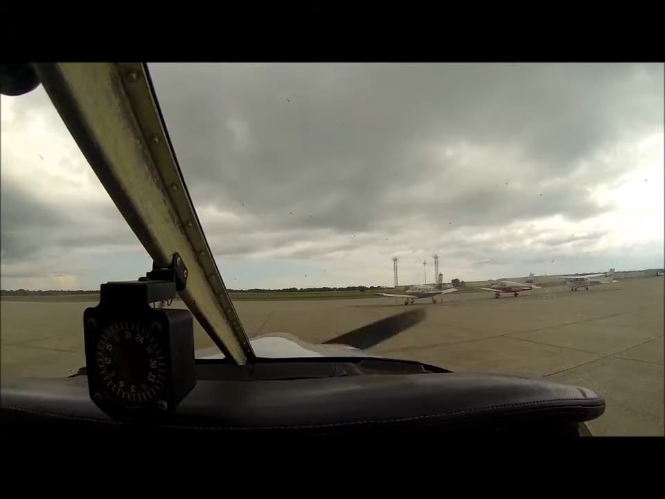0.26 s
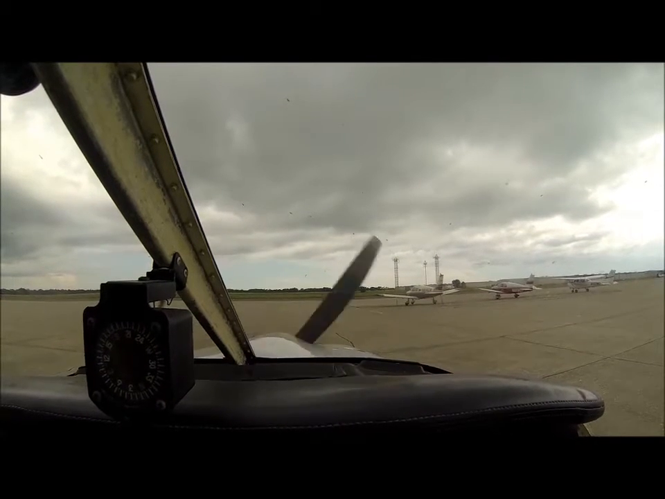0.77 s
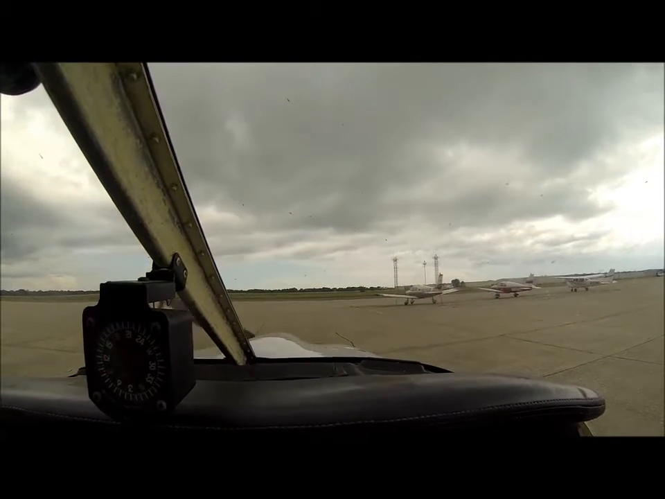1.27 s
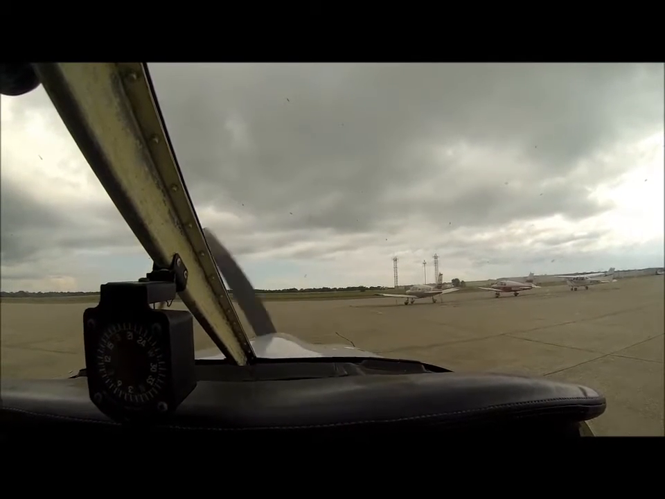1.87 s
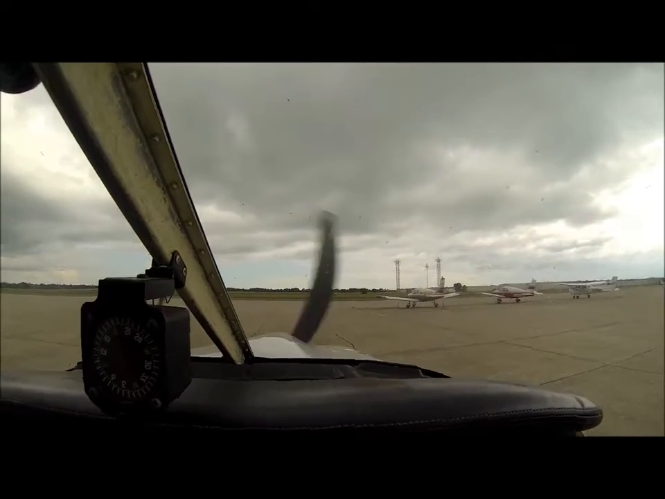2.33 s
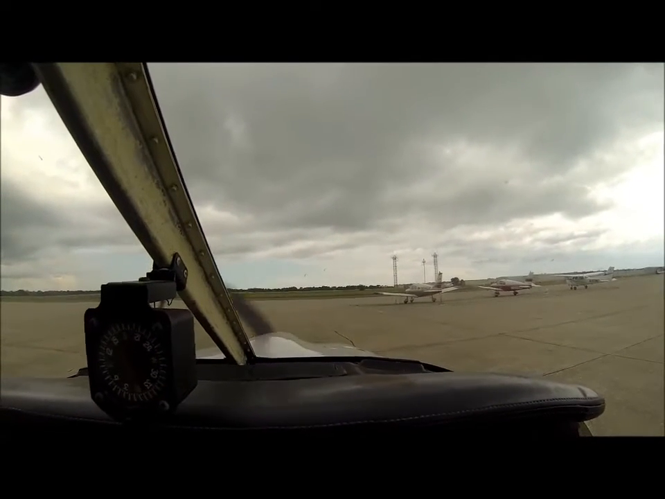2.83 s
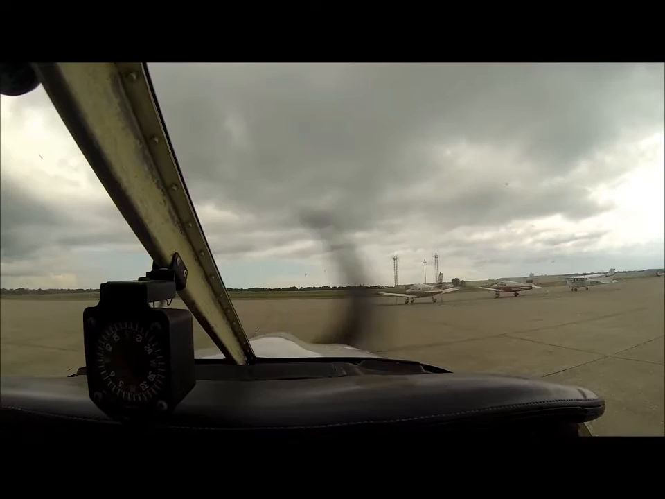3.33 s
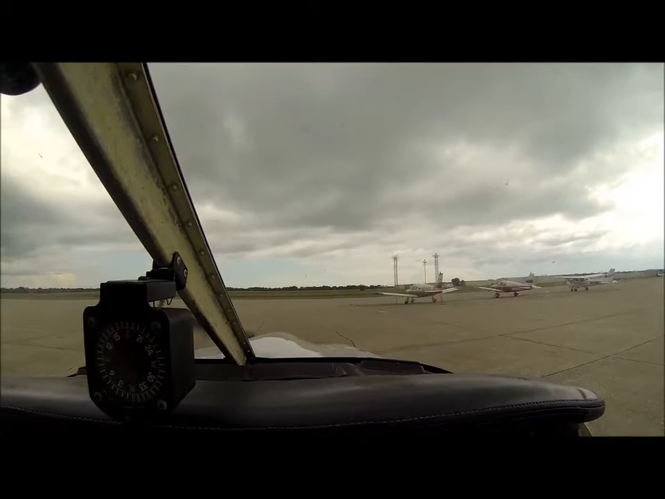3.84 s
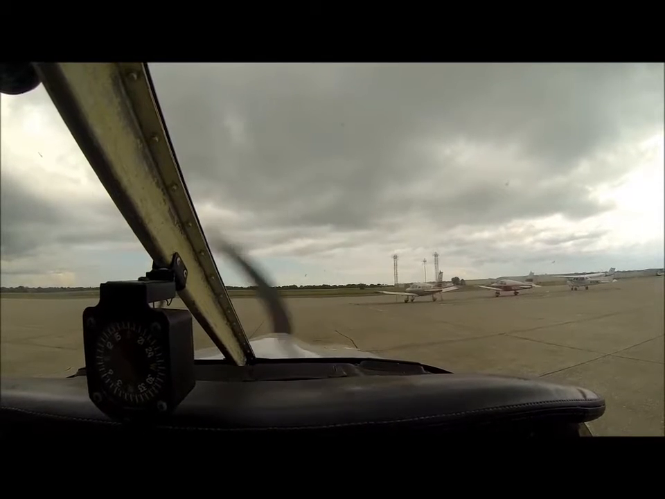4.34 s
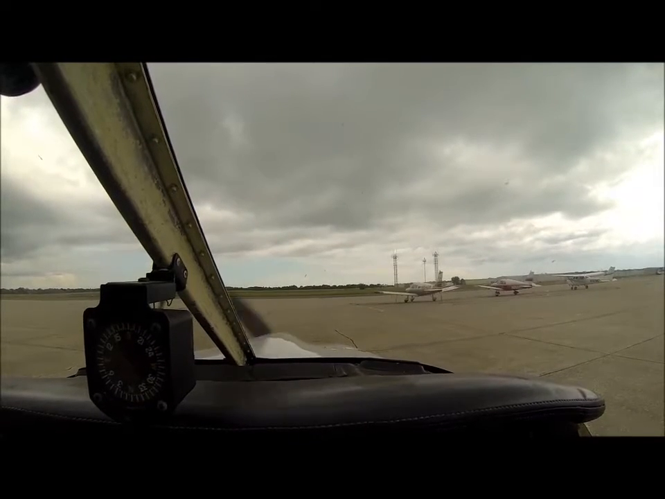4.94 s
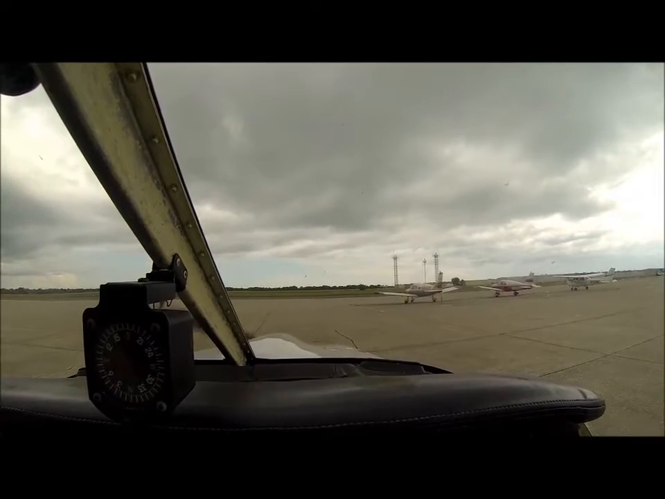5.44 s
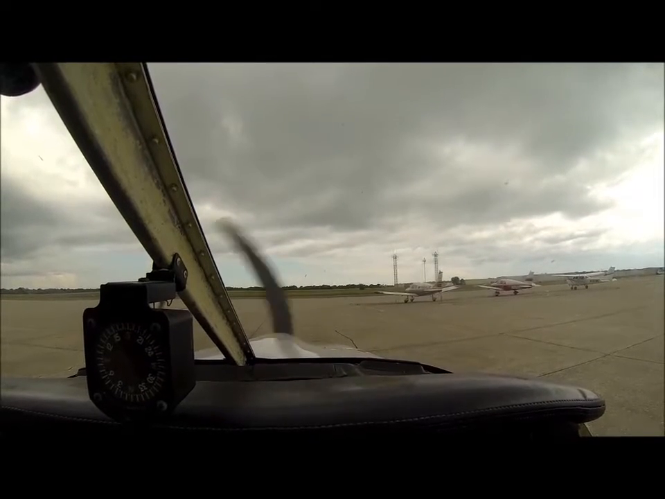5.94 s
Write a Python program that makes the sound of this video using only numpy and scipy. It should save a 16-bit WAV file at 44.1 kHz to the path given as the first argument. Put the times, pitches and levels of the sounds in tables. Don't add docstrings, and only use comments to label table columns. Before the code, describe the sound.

Inside a small plane's cabin, laboured cranking with hard plastic clicks gives way to an engine firing up, roaring briefly and settling into lumpy idling.

```python
import sys
import numpy as np
from scipy import signal
from scipy.fft import rfft, irfft, next_fast_len
from scipy.io import wavfile
from scipy.ndimage import uniform_filter1d, map_coordinates

SR = 44100
rng = np.random.default_rng(int(sys.argv[2]) if len(sys.argv) > 2 else 0)


def attenuation_scalar(level_db):
    decades = np.asarray(level_db, float) / 20
    return 10 ** decades


def file_out(sig):
    cols = np.atleast_2d(sig).T
    lim = np.clip(cols, -1, 1)
    pcm = np.round(lim * 32767).astype(np.int16)
    wavfile.write(sys.argv[1], SR, pcm)


N = 273420
TIME = np.arange(N) / SR
LOADED_TO_S, LOADED_FADE_S = 0.811, 0.086


def unit(x):
    return x / np.sqrt(np.mean(x ** 2) + 1e-20)


def curves(rows):
    s, *cols = np.transpose(rows)
    return [np.interp(TIME, s, c) for c in cols]


def during(rows, fade):
    start, end = rows[0][0], rows[-1][0]
    return np.interp(TIME, [start - fade, start, end, end + fade], [0, 1, 1, 0])


def wobble(rate):
    knots = rng.standard_normal(int(N * rate / SR) + 4)
    return map_coordinates(knots, [np.arange(N) * rate / SR])


def filtered(x, response):
    m = next_fast_len(N + SR // 2)
    return irfft(rfft(x, m) * response(np.fft.rfftfreq(m, 1 / SR)), m)[:N]


def colour(points):
    f, db = np.transpose(points)
    return lambda hz: attenuation_scalar(np.interp(np.log(hz + 1), np.log(f + 1), db))


def modes(peaks):
    def response(f):
        total = 0
        for k, (centre, width, db) in enumerate(peaks):
            total = total + (-1) ** k * attenuation_scalar(db) * 1j * f * width / (centre ** 2 - f * f + 1j * f * width)
        return total
    return response


def dulled(response, top_hz):
    return lambda f: response(f) / (1 + 1j * f / top_hz * 1.31 - (f / top_hz) ** 2) ** 2


# f/Hz, width/Hz, level/dB
CAVITIES = [(1547, 26, 0), (1891, 56, 2.5), (2535, 135, 0), (2850, 58, -1), (3070, 92, -9), (3630, 82, -5),
            (4800, 170, 0.5), (6330, 380, 1.5), (7770, 440, -8.5)]


def housed(points):
    return lambda f: colour(points)(f) * (1 + 0.86 * np.abs(modes(CAVITIES)(f)))


def noise(response):
    return unit(filtered(rng.standard_normal(N), response))


def bursts(times, dbs, lengths, attack):
    out, t = np.zeros(N + SR), np.arange(SR // 5) / SR
    for s, db, length in zip(times, dbs, np.abs(lengths) + 0.0012 + 0 * times):
        out[round(s * SR):][:len(t)] += attenuation_scalar(db - 26 * t / length) * (1 - np.exp(-t / attack))
    return out[:N]


def blows(times, dbs):
    return np.bincount(np.round(times * SR).astype(int), attenuation_scalar(dbs), N)


# t/s, firings per s, first order level/dB, second order level/dB
FIRING = [(2.4, 26.0, -25, -28), (2.5, 27.0, -28, -26), (2.77, 37.9, -29, -24.5), (3.09, 51.2, -35, -24),
          (3.21, 58.5, -38, -30), (3.27, 59, -38, -30), (3.33, 56.9, -22, -35), (3.61, 50.2, -25, -30),
          (4.02, 47.4, -22, -38), (4.19, 49.5, -24, -36), (4.3, 52, -27, -28), (4.42, 50.3, -18, -32),
          (4.67, 42.1, -24, -36), (4.83, 38.5, -25, -30), (5.1, 36.1, -24, -28), (5.77, 34.9, -27, -31),
          (5.86, 34.4, -29, -28), (6.2, 34.6, -24, -27)]


def firing_turns():
    return np.cumsum(curves(FIRING)[0]) / SR


def puffs(depth_db, scatter_db, lag):
    turns = firing_turns() + lag + 0.2 * wobble(15)
    sizes = rng.standard_normal(int(turns.max()) + 2)[np.abs(turns).astype(int)]
    stroke_db = during(FIRING, 0.19) * (scatter_db * sizes - depth_db * (turns % 1 - .5))
    return unit(attenuation_scalar(uniform_filter1d(stroke_db, size=SR // 250)))


# t/s, level/dB
STARTER_EFFORT = [(0.03, 7), (0.13, 2.5), (0.48, 4), (0.61, 4.5), (0.68, 4.5), (0.79, 3.5), (1.03, -3),
                  (1.16, 3.5), (1.29, 1), (1.49, -2.5), (1.87, 1.5), (2.11, 4.5), (2.34, -2)]
# t/s, level/dB
THROTTLE_EFFORT = [(2.38, -5.5), (2.45, -1), (2.68, -3.5), (2.809, -3), (3.131, 5), (3.46, 2), (3.48, -10),
                   (3.61, -0.5), (4.11, -0.5), (4.29, 2.5), (4.39, -1.5), (4.63, -2), (5.1, -2.5),
                   (5.67, 1.5), (5.98, 1), (6.08, 3.5), (6.2, 5)]
# t/s, loss/dB (negative: a gain)
UNEVEN_STROKES = [
    (2.522, 9.5),
    (2.6, 6),
    (3.49, -6),
    (3.537, -2.5),
    (4.599, 2.5),
]
# t/s, length/s, loss/dB
LULLS = [(.28, 0.024, 2.5), (.065, 0.037, 2.5), (0.13, 0.027, 0), (0.324, .03, 1), (0.511, 0.059, 2.5),
         (.71, 0.013, 0.5), (0.864, 0.04, 5), (0.985, 0.041, 2), (1.309, 0.0093, 14), (1.384, 0.03, 3),
         (1.568, 0.043, 2.5), (2.321, 0.033, 4)]


def effort():
    effort_db = curves(STARTER_EFFORT + THROTTLE_EFFORT)[0]
    for s, loss_db in UNEVEN_STROKES:
        effort_db = effort_db - loss_db * during([[s]], 0.052)
    for s, length, loss_db in LULLS:
        effort_db = effort_db - loss_db * during([[s], [s + abs(length)]], 0.012)
    return effort_db


# level/dB at effort 0, dB per dB of effort
CRANK_LAYERS = [(-22.5, 2.07), (-44, 1.5), (-52.5, 1.38)]
RUN_LAYERS = [(-19.5, 0.67), (-32.5, 0.91), (-49, 0.96)]


def layer_levels():
    running, effort_db = during(FIRING, 0.087), effort()
    levels = []
    for (db, slope), (run_db, run_slope) in zip(CRANK_LAYERS, RUN_LAYERS):
        cranked = (1 - running) * (db + slope * effort_db)
        levels.append(cranked + running * (run_db + run_slope * effort_db))
    return levels


# t/s, level/dB
TICKS = [
    (0.001, -30),
    (3.419, -44),
    (6.055, -43),
]
# f/Hz, level/dB per Hz
HIGH_HISS = [(8000, -17), (12000, -6), (14500, 2), (15200, 2), (15500, -40)]


def small_noises():
    s, db = np.transpose(TICKS)
    load = .4 + .6 * during([[0], [LOADED_TO_S]], LOADED_FADE_S)
    hiss = attenuation_scalar(-84 + 1.5 * wobble(20)) * load * noise(colour(HIGH_HISS))
    return hiss + bursts(s, db, .001 + 0 * s, .0001) * rng.standard_normal(N)


# t/s, length/s, f/Hz, level/dB
WHISTLES = [(0.086, 0.027, 6500, -72), (0.113, 0.013, 3570, -52), (0.143, .03, 4900, -62),
            (0.297, 0.017, 3460, -49), (0.373, 0.017, 3470, -58), (1.905, .02, 12000, -69),
            (0.748, 0.027, 3350, -46.5), (1.03, .022, 3400, -61), (1.07, 0.026, 3540, -64),
            (1.27, 0.013, 5030, -60), (1.419, 0.012, 3600, -58), (1.537, 0.017, 3650, -54),
            (1.661, 0.013, 6630, -56), (5.17, 0.045, 2450, -59), (5.63, .075, 2650, -58),
            (5.99, .02, 3290, -57), (6.067, 0.066, 2500, -56), (6.088, 0.027, 3310, -54),
            (6.16, 0.018, 4620, -57)]


def whistles():
    out = np.zeros(N)
    flutter, drift = attenuation_scalar(4 * wobble(200)), 1.6 * wobble(300)
    for s, length, hz, db in WHISTLES:
        span = slice(round(s * SR), round((s + abs(length) + .008) * SR))
        t = TIME[span]
        tone = np.sin(2 * np.pi * hz * t + drift[span])
        out[span] += attenuation_scalar(db) * signal.windows.tukey(len(t), .4) * flutter[span] * tone
    return out


# t/s, length/s, level/dB
SQUEAK = [
    (5.13, .02, -71),
    (5.24, .11, -65.5),
    (5.39, .05, -65),
    (5.46, .12, -63.5),
    (5.63, .18, -63.5),
    (5.98, .06, -65),
    (6.08, .1, -67),
]
# f/Hz, width/Hz, level/dB
LOOSE_PART = [(4405, 75, 0), (4640, 100, -5)]


def squeak():
    chirp, bouts = 0, 0
    for hz, width_hz, db in LOOSE_PART:
        tone = np.sin(2 * np.pi * hz * TIME + .7 * wobble(width_hz))
        chirp = chirp + attenuation_scalar(db + 2 * wobble(30)) * tone
    for s, length, db in SQUEAK:
        bouts = bouts + attenuation_scalar(db) * during([[s], [s + length]], .015)
    return bouts * attenuation_scalar(4.5) * puffs(15, 2, .4) * chirp


# t/s, length/s, from f/Hz, to f/Hz, level/dB
MOANS = [
    (3.112, 0.38, 108, 144.7, -29.5),
    (3.8, 0.253, 99.9, 145.3, -29),
    (5.597, .4, 185, 272, -47),
]


def moans():
    out = 0
    for s, length, from_hz, to_hz, db in MOANS:
        hz = np.interp(TIME, [s, s + length], [from_hz, to_hz])
        size = attenuation_scalar(db + 1.5 * wobble(20)) * during([[s], [s + length]], 0.024)
        out = out + size * np.sin(2 * np.pi * np.cumsum(hz) / SR)
    return out


# t/s, level/dB
ROCKS = [(0.0, -40), (0.98, -25), (1.17, -30), (1.27, -23), (1.5, -26), (1.78, -26), (1.87, -46),
         (2.03, -21.5), (2.219, -20), (2.371, -25), (2.47, -33)]
# t/s, level/dB
HUM_LOAD = [(0.03, -5), (.11, 1), (.17, -6), (.25, 2.5), (.45, 0.5), (.65, 1), (.72, -6), (.82, -2.5)]


def hum():
    s, db = np.transpose(ROCKS)
    steady = attenuation_scalar(-20.5 + curves(HUM_LOAD)[0]) * during([[0.1], [LOADED_TO_S]], LOADED_FADE_S)
    size = steady + bursts(s, db + 5.0, 0.13 + 0 * s, 0.035)
    hz = 55.7 + .6 * wobble(5)
    return np.sqrt(2) * size * attenuation_scalar(1.1 * wobble(12)) * np.sin(2 * np.pi * np.cumsum(hz) / SR)


def groans(s, db, groan_hz, length):
    out, t = np.zeros(N + SR), np.arange(SR // 10) / SR
    wavering = np.pad(1 + 0.023 * wobble(25), (0, SR), "edge")
    arch = np.sin(np.pi * np.clip(t / 0.044, 0, 1)) - .5
    for at, level_db, hz, lasts in zip(np.round(s * SR).astype(int), db, groan_hz, length):
        turns = np.cumsum(hz * (1 + 0.065 * arch) * wavering[at:][:len(t)]) / SR
        swell = attenuation_scalar(level_db - 26 * t / lasts) * (1 - np.exp(-t / 0.009))
        out[at:][:len(t)] += swell * np.sin(2 * np.pi * turns)
    return out[:N]


# t/s, peak level/dB, knock level/dB, groan f/Hz
CHUFFS = [(0.013, -34, 10.5, 664), (0.113, -40.5, 5, 642), (0.172, -35, -1, 678), (0.197, -37.5, 4.5, 655),
          (0.25, -43, 12, 533), (0.397, -35, 7.5, 640), (0.432, -41.5, 17.5, 278), (0.47, -34, -0.5, 835),
          (0.585, -37.5, 6, 695), (0.721, -47, 14, 505), (1.032, -51, -5, 740.3), (1.1, -41, 11, 670),
          (1.15, -34.5, 8, 514), (1.539, -42.5, 2, 644), (1.636, -43.5, 7, 267), (1.668, -38, 3.5, 830),
          (1.764, -38.5, 5.5, 520), (1.912, -39.5, -4, 827), (1.96, -41, 13, 493),
          (1.993, -39.5, 18.5, 245), (2.12, -32, 11, 587), (2.211, -55.5, 14, 296), (2.282, -46, -1, 610),
          (2.365, -39.5, 5, 446), (2.43, -41, 3, 637), (0.212, -36.5, 8.5, 349), (0.255, -46, 15, 289),
          (0.651, -33.5, 6, 505), (0.678, -40, 10, 698), (0.648, -44.5, 14.5, 821), (0.684, -47, 10, 894),
          (0.69, -47, 13, 580), (0.431, -51, 13, 498), (0.47, -48, 15, 508), (0.405, -45, 7.5, 926),
          (0.2, -51, 10, 955), (0.011, -48.5, 15, 954), (0.595, -50, 14, 290), (0.235, -42.5, 1, 666),
          (0.248, -58, 0, 820)]
SPITTING_CHUFFS = [(0.297, -45, 6, 660), (0.364, -42, 9, 624), (0.604, -39, -10, 830), (1.962, -39, 3, 704),
                   (1.742, -52, 9, 510), (1.84, -48, 9, 586), (0.758, -35.5, -10, 354),
                   (0.804, -41, 10, 800), (1.188, -33, 3.5, 715), (1.232, -37, 8.5, 649),
                   (1.282, -45.5, 9, 795), (1.425, -55, 0, 610), (1.799, -47.5, 12, 512),
                   (1.88, -47, 2.5, 267), (1.969, -39.5, 18, 497), (2.026, -47, -2, 341),
                   (2.514, -49, 6, 303), (2.586, -45, 5, 233), (0.632, -50, -11, 602.7),
                   (0.659, -38, -11, 620), (0.684, -41, -9, 900), (0.406, -56, -5, 659),
                   (0.423, -53, -8, 659), (0.445, -49, -11, 655), (0.909, -50, -2, 510),
                   (1.62, -58, 11, 500), (1.927, -78, -7, 795)]
# f/Hz, level/dB per Hz
PUFF = [(800, 4.5), (1050, 0), (1550, 1.5), (1900, 4), (2250, -6.5), (2750, -8.5), (3100, -17),
        (3600, -11.5), (4050, -38), (5400, -56)]
# f/Hz, level/dB per Hz
SPIT = [(2100, -32), (3650, 8), (5450, -1), (7700, -3), (9100, -6), (10600, -10), (13400, -19),
        (15600, -41)]
# f/Hz, width/Hz, level/dB
PANEL = [(606, 17, -2.5), (850, 210, -9), (322, 102, -5.5)]


def chuffs():
    dull = [(*c, -16.5) for c in CHUFFS]
    bright = [(*c, -6) for c in SPITTING_CHUFFS]
    s, db, knock_db, groan_hz, spit_db = np.transpose(sorted(dull + bright))
    loaded = s < LOADED_TO_S
    length = 0.022 * np.where(loaded, 0.99, 1)
    grit = attenuation_scalar(0.54 * wobble(300))
    puff = bursts(s, db + 11.5, 1.35 * length, 0.0091) * noise(housed(PUFF))
    spit = bursts(s, db + spit_db + 7.0, 1.25 * length, 0.0055) * noise(housed(SPIT))
    panel = noise(dulled(modes(PANEL), top_hz=1200))
    knock = bursts(s, db + knock_db - 2.5, 2.16 * length, 0.0044) * panel
    groan = groans(s, db + knock_db + 10.0, groan_hz, np.where(loaded, 2.5, 1.7) * length)
    return grit * (puff + attenuation_scalar(2.8 * wobble(1200) - 0.5) * spit) + knock + groan


# f/Hz, level/dB, t60/s
SHELL = [(414, -15.5, 0.048), (609, 2, 0.037), (940, -9, 0.026), (1224, -3, .02), (1556, -0.5, 0.023),
         (1816, -9, 0.041), (2230, 1, 0.0096), (2518, -8.5, 0.03), (2796, -4.5, 0.014), (3290, -4, 0.011),
         (3770, -3, 0.012), (4430, -11, 0.018), (4760, -7.5, 0.011), (5380, -22, 0.021)]
# body mode, second mode, middle mode, rebound level/dB
GRIPS = [(-6, 2, -4, -11), (-8, 11, 0, 0.5), (-2, 6, 2, -7), (-1, -2, -1, -8), (1.5, -3, 0, -13.5),
         (-2.5, -2, -1.5, -14), (-1, 0, 4, -2), (2.5, 0, -0.5, -13), (1.5, 7, 4.5, -8.5), (2, 2, 0, -8),
         (-0.5, -7, 2, -16), (1, -1, 0.5, -10), (2.5, 5, 7.5, -11), (2.5, -5.5, 1, -8), (-4, -6, 2, -8),
         (-1, 2, -1.5, -6.5), (1.5, 12.5, 3, -30), (-0.5, -10, 0, -4), (-1.5, -1, -1, -13),
         (-1.5, -4, -1, -17), (-11, 8, 1.5, -13), (0, -1, 1, -9)]


def shell(s, db, length):
    out, t = np.zeros(N + SR), np.arange(SR // 20) / SR
    hz, mode_db, t60 = np.transpose(SHELL)[:, :, None]
    index = np.arange(len(SHELL))[:, None]
    sense = (-1.) ** index
    body, second, middle = (index == k for k in (1, 2, 4))
    swell = (1 - np.exp(-t / 0.00018)) * np.where(body, 1 - np.exp(-t * hz / 0.69), 1)
    scatter_db = 1.2 * rng.standard_normal((len(s), len(SHELL), 1))
    for at, blow_db, lasts, chance_db, grip in zip(s, db, np.abs(length), scatter_db, GRIPS):
        body_db, second_db, middle_db, rebound_db = grip
        level_db = mode_db + chance_db + 0.3836 * (blow_db + 12.5) * np.log2(hz / 1000)
        level_db = level_db + body * body_db + second * second_db + middle * middle_db
        decay = attenuation_scalar(level_db - 60 * t / (t60 * lasts / 0.014))
        ring = swell * sense * decay * np.sin(2 * np.pi * hz * t)
        again = np.pad((ring * ~body).sum(axis=0), (round(.38 * lasts * SR), 0))[:len(t)]
        stop = attenuation_scalar(-3000 * np.clip(t - 0.78 * lasts, 0, None))
        out[round(at * SR):][:len(t)] += attenuation_scalar(blow_db - 0.5) * stop * (ring.sum(axis=0) + attenuation_scalar(rebound_db) * again)
    return out[:N]


# t/s, peak level/dB, ring level/dB, length/s, first-contact brightness/dB
SNAPS = [(0.654, -26, -16, 0.012, 4), (0.6909, -27.5, -22, 0.022, -4), (0.694, -18.5, -28, 0.0092, -6),
         (0.731, -28.5, -20, 0.01, -4), (0.8304, -13, -21.5, 0.017, -3), (0.926, -19, -13, 0.019, -1.5),
         (0.9753, -29.5, -23, 0.008, -9), (1.1406, -14.5, -28, 0.0073, -12),
         (1.2212, -17, -8.5, 0.013, -15), (1.3124, -12.5, -11.5, 0.014, -1),
         (1.4768, -24.5, -25, 0.0083, -6), (1.689, -14, -44, 0.012, 1), (1.7213, -28, -24, 0.0061, -13),
         (1.826, -15, -42, 0.018, 1), (1.9523, -23, -17, 0.0089, -8), (2.013, -12.5, -29, 0.0088, -2.5),
         (2.0497, -8.5, -26, 0.0047, 3.5), (2.0718, -13, -27, 0.0074, 0), (2.1051, -13, -28, 0.0099, 0.5),
         (2.143, -11.5, -26, 0.011, -4), (2.1625, -9.5, -37, 0.0081, 1.5), (2.3095, -10, -26, 0.0096, 5.5)]
# f/Hz, level/dB per Hz
CONTACT = [(2500, -43), (4500, 15.5), (6500, -2), (9000, -9.5), (12000, -21), (15000, -42), (15700, -75)]


def snaps():
    s, db, ring_db, length, bright_db = np.transpose(SNAPS)
    contacts = rng.choice([-1., 1.], N) * (rng.random(N) < .6)
    rattle = dulled(modes([(hz, 200, mode_db) for hz, mode_db, _ in SHELL]), top_hz=6500)
    chatter = filtered(bursts(s, db + 6.5, 0.77 * length, 0.00074) * contacts, rattle)
    crack = shell(s, db, length) + chatter
    tick_db = db - 11.5 + bright_db + 0.5 * (db + 15.0)
    tick = bursts(s, tick_db, 0.26 * length, 0.0001) * noise(colour(CONTACT))
    body = dulled(modes([(224, 600, 0.0013)]), top_hz=920)
    thud = filtered(bursts(s, db + 5.5, 1.85 * length, 0.00028) * contacts, body)
    bracket_hz, bracket_t60 = 1855, .3
    bracket = np.sin(2 * np.pi * bracket_hz * TIME + 0.4 * wobble(68))
    ring = bursts(s, db + ring_db, bracket_t60 * 0.21, 0.0011)
    damped = bursts(s + 0.077, db + ring_db - 0.5, bracket_t60 * 0.29, .006)
    return crack + tick + thud + np.clip(ring - damped, 0, None) * bracket


def gain_dips(lead=0.011, hold=0.0272, smooth=0.0036):
    dips = np.zeros(N)
    for s, db, *_ in SNAPS:
        dips[round((s - lead) * SR):round((s + hold) * SR)] = -max(0.19 * (db + 28), 0)
    return attenuation_scalar(uniform_filter1d(dips, max(1, round(smooth * SR))))


# f/Hz, level/dB per Hz
BUFFET = [(4.7, -34), (8.0, -14), (24, 2), (36, -2), (55, -5), (82, -9.5), (108, -8.5), (145, -9.5),
          (215, -19.5), (400, -25.5), (520, -62), (880, -120)]


def buffet(level_db, lumps):
    running = during(FIRING, 0.33)
    sway = noise(lambda f: colour(BUFFET)(f) * (f < 110))
    deep = filtered(sway, lambda f: 1 / (1 + (f / 60) ** 4) + .25)
    sway = running * sway + (1 - running) * deep
    lumpy = attenuation_scalar((1.0 + 1.16 * running) * lumps) * noise(colour(BUFFET))
    drum = filtered(lumpy, lambda f: 1.0 * (f >= 110))
    mixed = (0.5 + 0.29 * running) * sway + (0.26 + 0.5 * running) * drum
    return attenuation_scalar(level_db - 2.0 + 0.31 * wobble(8.0)) * mixed


# f/Hz, level/dB per Hz
RASP = [(150, -41), (250, -1.5), (297, -9), (437, -2), (488, 1.5), (723, 0.5), (940, -9), (1050, -14.5),
        (1300, -21), (1690, -36), (2860, -120)]


def rasp(level_db, lumps):
    rough = attenuation_scalar(level_db - 1 + .5 * lumps + 1.5 * wobble(170))
    return rough * puffs(8, .9, 0) * noise(colour(RASP))


# f/Hz, level/dB per Hz
HISS = [(800, -47), (1050, -2.5), (1300, -6), (1550, -2), (1900, -5), (2250, -14.5), (2750, -13),
        (3100, -16), (4600, -17), (6500, -27.5), (7800, -23.5), (10500, -29), (13500, -41), (15700, -59)]
# f/Hz, level/dB per Hz
FAST_FLOW = [(800, -25), (1150, 3.5), (1700, -3), (3000, -16), (5500, -22.5), (7900, -15.5), (11000, -21.5),
             (14000, -35), (15600, -55)]


def valve_hiss(level_db, lumps):
    running = during(FIRING, 0.33)
    level_db = level_db + 2 * np.interp(TIME, [3.37, 3.465, 3.47], [0, 1, 0])

    def weak_flow(f):
        return colour(HISS)(f) / (1 + (f / 6000) ** 2) * (0.39 + 0.85 * np.abs(modes(CAVITIES)(f)))

    weak = noise(weak_flow)
    sizzle = attenuation_scalar(-6.5 + 0.41 * (curves(FIRING)[0] - 52)) * noise(housed(FAST_FLOW))
    air = running * (noise(housed(HISS)) + sizzle)
    air = air + (1 - running) * (0.71 * weak + 0.14 * noise(colour(SPIT)))
    rough = attenuation_scalar(level_db + 2.0 + 0.097 * lumps + 1.34 * wobble(120))
    return rough * puffs(3.7, 0.16, 0) * air


def shaking():
    buffet_db, rasp_db, hiss_db = layer_levels()
    lumps = wobble(35)
    return buffet(buffet_db, lumps) + rasp(rasp_db, lumps) + valve_hiss(hiss_db, lumps)


# t/s, level/dB
HARD_BARKS = [(2.415, -27), (2.568, -36), (2.647, -22), (2.679, -23), (2.696, -21), (2.759, -19),
              (2.883, -24), (2.907, -20), (3.01, -23), (3.055, -25), (3.072, -30), (3.116, -27),
              (3.169, -18), (3.211, -16), (3.245, -14.5), (3.283, -19), (3.401, -21), (3.504, -22),
              (3.541, -31), (3.805, -17), (3.856, -17.5), (3.948, -15), (3.972, -13), (4.034, -21),
              (4.098, -27), (4.116, -23), (4.28, -14), (4.299, -15), (4.361, -12.5), (4.697, -22),
              (4.744, -28), (4.771, -36), (4.791, -28), (4.925, -20), (4.95, -17.5), (5.175, -19.5),
              (5.223, -27), (5.337, -20), (5.373, -14), (5.535, -19), (5.628, -14.5), (5.713, -16.5),
              (5.909, -23), (5.944, -16), (5.976, -11.5), (5.998, -23), (6.03, -20), (6.062, -12.5),
              (6.095, -11.5), (6.171, -19)]


def barks():
    strokes = np.flatnonzero(np.diff(np.floor(firing_turns() + .08 * wobble(20))) > 0)
    sizes = rng.choice([-1, 1], len(strokes)) * attenuation_scalar(1.5 * rng.standard_normal(len(strokes)))
    ring = unit(filtered(np.bincount(strokes, sizes, N), dulled(modes(PANEL), top_hz=900)))
    s, db = np.transpose(HARD_BARKS)
    hard = filtered(-blows(s, db + 37), dulled(modes(PANEL), top_hz=1210))
    return during(FIRING, 0.089) * attenuation_scalar(layer_levels()[1] - 10.0) * ring + hard


# t/s, peak level/dB, f/Hz
KICKS = [(3.161, -8, 132), (3.454, -8, 142), (3.516, -13.5, 73), (3.578, -15, 115), (3.826, -26, 108.1),
         (3.987, -10, 151.1), (4.226, -12, 122), (4.311, -10, 112), (4.368, -8.5, 110), (4.49, -16, 93),
         (4.873, -11, 104), (5.75, -10.5, 135), (5.867, -12.5, 72.2), (6.054, -17, 82), (6.082, -6, 60.4),
         (4.429, -13, 47), (6.119, -11.5, 59), (6.147, -7, 66.5), (6.18, -8.5, 60.4)]


def kicks():
    out, t = np.zeros(N + SR), np.linspace(-1, 1, SR // 20) / 40
    for s, db, hz in KICKS:
        push = rng.choice([-1, 1]) * np.cos(2 * np.pi * hz * t) * np.exp(-(t * hz * 1.6) ** 2)
        out[round(s * SR) - len(t) // 2 + SR // 90:][:len(t)] += attenuation_scalar(db - 3.0) * push
    return out[:N]


ORDER_DB = [-33, -1, -1, -36.5, -45, -47.5]


def thump():
    turns, (_, first_db, second_db) = firing_turns(), curves(FIRING)
    shared_db = .4 * effort()
    third_db = shared_db - 7 * (np.arange(N) < 3.6 * SR)
    loads_db = [shared_db, first_db, second_db, third_db, shared_db, shared_db]
    orders, sways_db = (.5, 1, 2, 3, 4, 5), (2.5, 1, 1.2, 2.5, 2.5, 2.5)
    out = 0
    for order, db, load_db, sway_db in zip(orders, ORDER_DB, loads_db, sways_db):
        size = attenuation_scalar(db + load_db + sway_db * wobble(14))
        out = out + size * np.sin(2 * np.pi * order * turns + 0.5 * wobble(3.13))
    return np.sqrt(2) * during(FIRING, 0.09) * out


def scene():
    engine = thump() + kicks() + barks() + hum() + shaking()
    background = engine + squeak() + chuffs() + small_noises() + whistles() + moans()
    return (gain_dips() * background + snaps())[None]


def top_cut(x):
    return signal.sosfilt(signal.butter(12, 15740, fs=SR, output="sos"), x)


def record(dry):
    ceiling = .56
    held = dry / (1 + np.abs(dry / ceiling) ** 8) ** (1 / 8)
    held = held * np.clip((N - np.arange(N)) / (SR // 200), 0, 1)
    return top_cut(held)


dry = scene()
out = record(dry)
file_out(out)
```